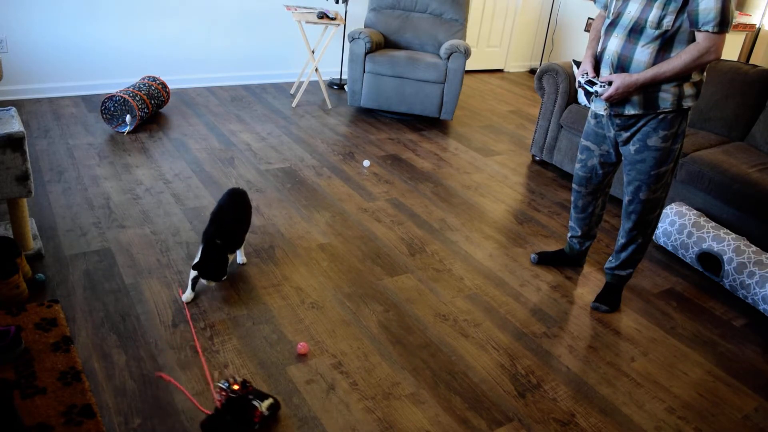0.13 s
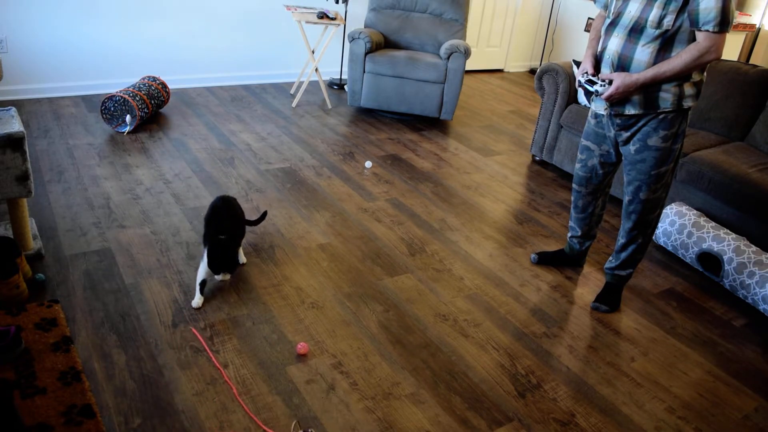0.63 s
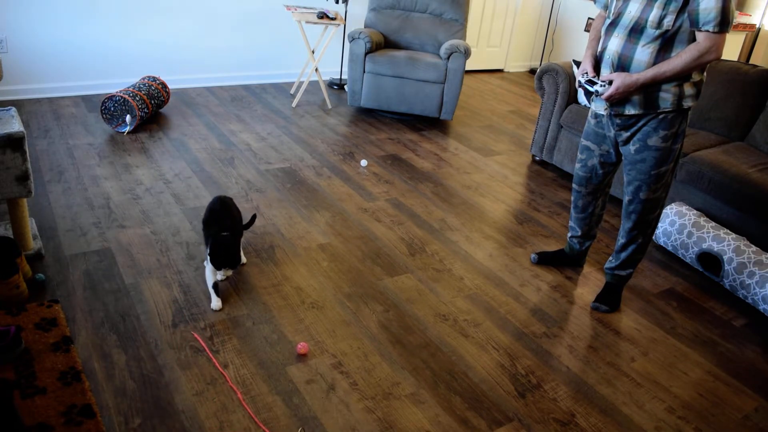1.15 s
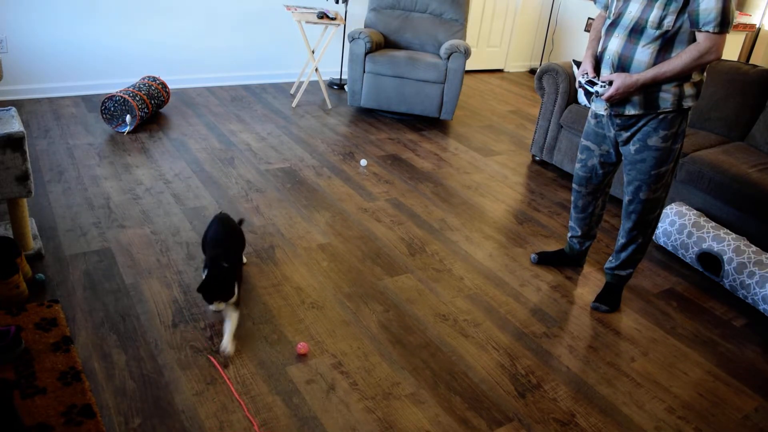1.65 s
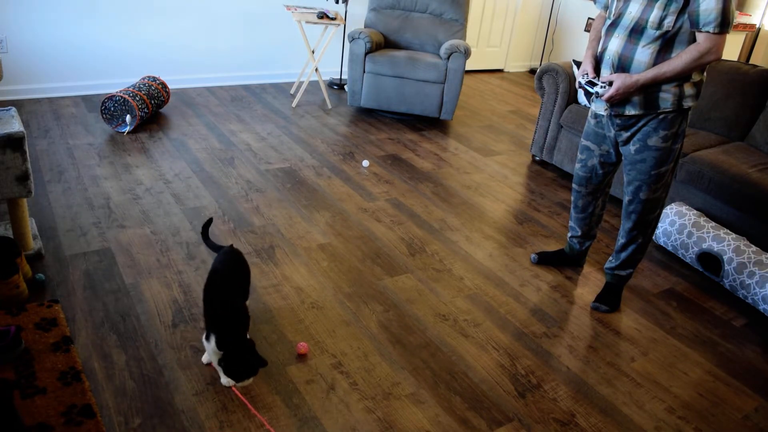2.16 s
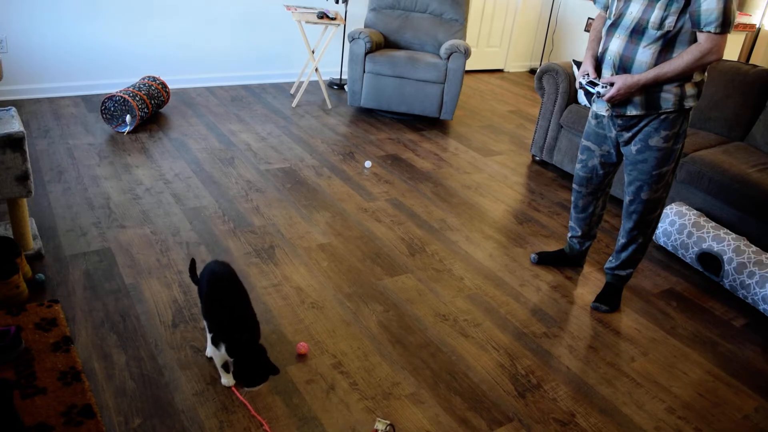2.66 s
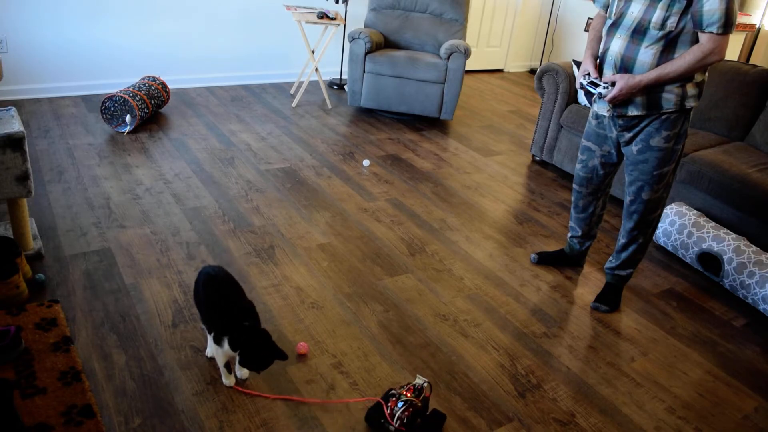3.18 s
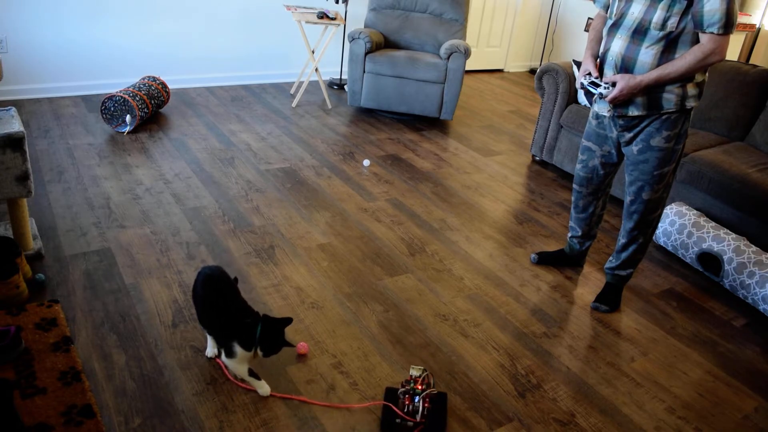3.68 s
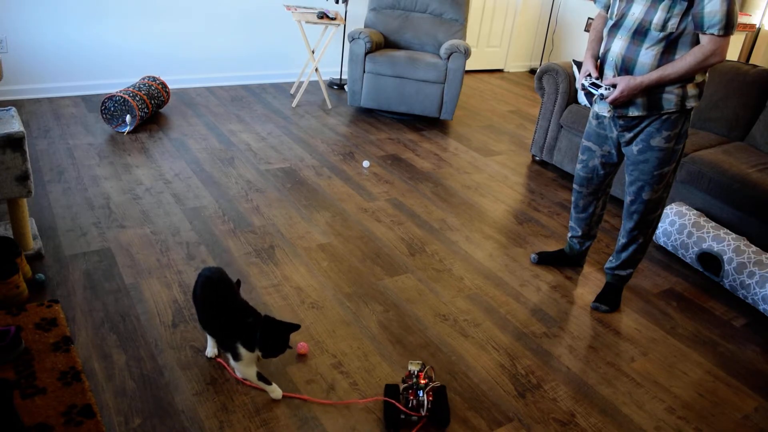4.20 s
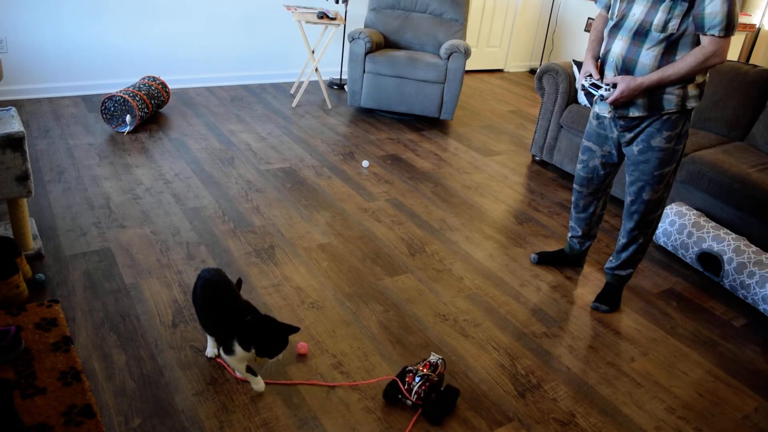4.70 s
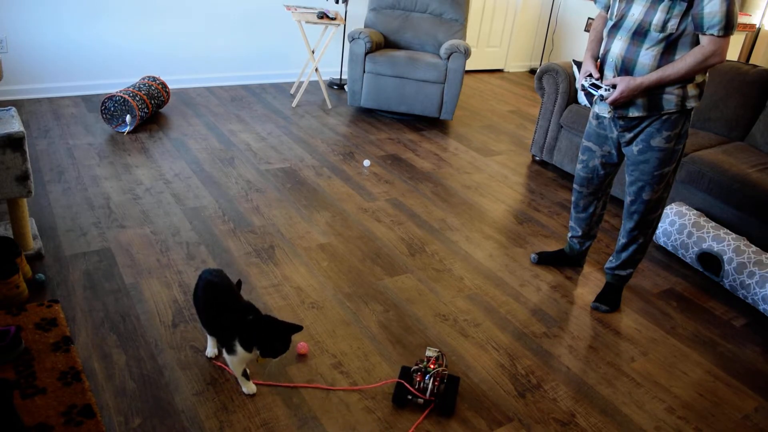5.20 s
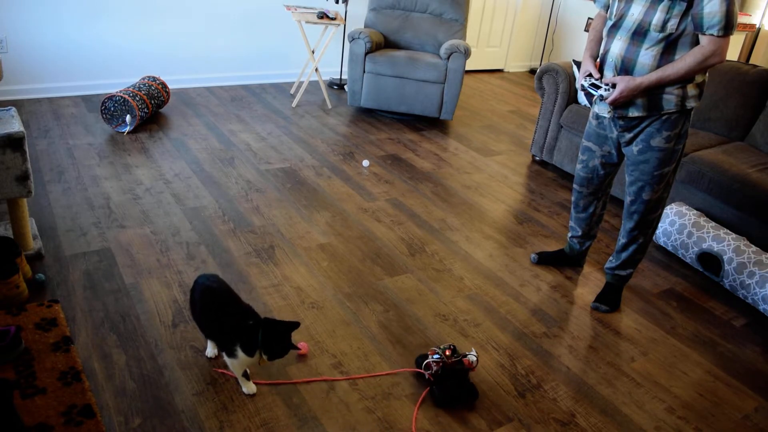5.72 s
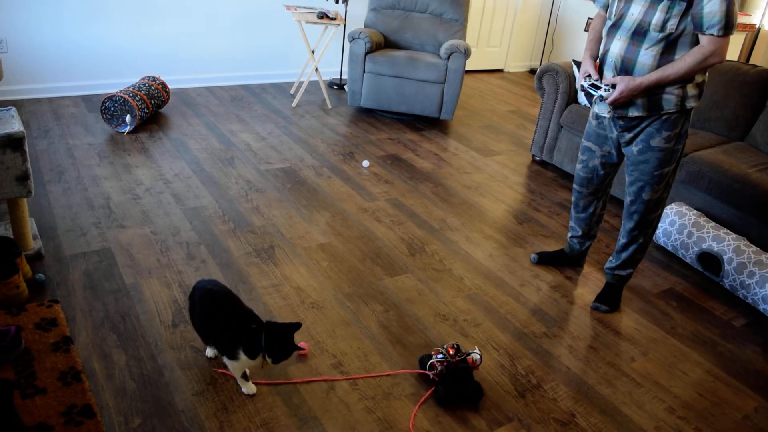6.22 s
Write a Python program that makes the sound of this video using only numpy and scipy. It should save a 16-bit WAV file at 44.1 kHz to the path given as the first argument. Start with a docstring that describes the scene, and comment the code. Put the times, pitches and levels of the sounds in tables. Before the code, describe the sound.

A small remote-controlled car drives over a wooden floor in a quiet living room. Already whirring loudly at the start, it fades, then runs again for a longer stretch with thin dry squeaks, pauses, and continues in short jerky bursts. Plastic gears rattle and tick, wheels drum and knock on the boards. One distant-ish microphone picks up light room reverberation and a faint low hum.

```python
"""A small remote-controlled car whirs in stop-start bursts over a wooden floor in a quiet living room.
Gears: dense noise impacts ring loose plastic parts and shell. Wheels: impacts drum chassis and boards.
Tyres rumble, chassis rings whine, teeth tick, wheels knock, a dry bearing squeals, gear play clunks.
Motor speed curves set the levels of whirr, treble, drumming and tyres; random reflections add the room."""
import sys
import numpy as np
from scipy import signal
from scipy.fft import rfft, irfft
from scipy.io import wavfile
from scipy.ndimage import uniform_filter1d

SR = 44100
rng = np.random.default_rng(int(sys.argv[2]) if len(sys.argv) > 2 else 0)


def undo_db(level):
    """Turn decibels back into plain size, where 20 dB means ten times bigger."""
    steps = np.asarray(level, float) / 20
    return 10 ** steps


def wrap_up_sound(samples):
    """Save the sound to the file named by the first command line argument, as 16-bit audio."""
    columns = np.atleast_2d(samples).T
    # keep every value between -1 and 1, then stretch to whole-number steps
    tamed = np.clip(columns, -1, 1)
    steps = np.round(tamed * 32767).astype(np.int16)
    wavfile.write(sys.argv[1], SR, steps)


N = 280035
TIME_S = np.arange(N) / SR
SLOW_TIME_S = TIME_S[::32]


def evened(x):
    """Scales to rms 1."""
    return x / np.sqrt(np.mean(x ** 2) + 1e-20)


def read(points, hz):
    """Interpolates (frequency, value) points over log frequency."""
    f, value = np.transpose(points)
    return np.interp(np.log(hz + 1), np.log(f + 1), value)


def control(table, column):
    """One column of a table as a curve over time."""
    rows = np.vstack(table)
    return np.interp(TIME_S, rows[:, 0], rows[:, column])


def wander(seconds):
    """Slow chance of rms 1 that changes over about the given time."""
    size = max(round(seconds * SR), 1)
    return evened(uniform_filter1d(uniform_filter1d(rng.standard_normal(N), size), size))


def add(mix, start_s, sound):
    """Adds a sound in place, cut off at the end of the mix."""
    part = mix[round(start_s * SR):][:len(sound)]
    part += sound[:len(part)]


def resonate(x, hz, width_hz):
    """A two-pole ring of about gain 1 at its centre."""
    r = np.exp(-np.pi * width_hz / SR)
    return signal.lfilter([1 - r * r, 0, r * r - 1], [2, -4 * r * np.cos(2 * np.pi * hz / SR), 2 * r * r], x)


def glide(x, hz, width_hz):
    """A ring of rms 1 that follows the curve hz: shift down, smooth twice, shift back."""
    turn = np.exp(2j * np.pi * np.cumsum(hz) / SR)
    r = np.exp(-np.pi * width_hz / SR)
    once = signal.lfilter([1 - r], [1, -r], x / turn)
    twice = signal.lfilter([1 - r], [1, -r], once)
    return evened((turn * twice).real)


def causal(gain_db):
    """Impulse response that starts at once and has the given colour (minimum phase)."""
    log_gain = np.log(undo_db(np.maximum(gain_db, -100)))
    circle = np.concatenate([log_gain, log_gain[-2:0:-1]])
    return np.fft.ifft(np.exp(np.conj(signal.hilbert(circle)))).real[:2048]


def band_rms(x, lo_hz, hi_hz):
    """Rms of x within a band."""
    sos = signal.butter(4, [lo_hz, hi_hz], "bandpass", fs=SR, output="sos")
    return np.std(signal.sosfilt(sos, x))


def impacts(per_s, spread_db, smooth):
    """Random blows of uneven size over smooth rubbing noise, both throbbing once a motor turn."""
    shaft_hz, depth = 139, .12
    size = undo_db(spread_db * np.minimum(rng.exponential(1, N), 3.2)) * rng.choice([-1., 1.], N)
    blows = evened(size * (rng.random(N) < per_s / SR))
    turns_per_s = shaft_hz * (1 + .03 * evened(uniform_filter1d(rng.standard_normal(N), 4000)))
    throb = 1 + depth * np.cos(2 * np.pi * np.cumsum(turns_per_s) / SR)
    return throb * (blows + smooth * rng.standard_normal(N))


def scattered(per_s, level_db, hz, detune):
    """Rows (time [s], level [dB], frequency [Hz]) at random moments, 0-6 dB under level_db there."""
    when, size, pitch = rng.random((round(per_s * N / SR), 3)).T
    at = (when * (N - 1)).astype(int)
    pitch_hz = (hz * np.ones(N))[at] * (1 + detune * (2 * pitch - 1))
    return list(zip(TIME_S[at], level_db[at] - 6 * size, pitch_hz))


def speed(start_s, powered_s, spin_up_s, coast_s):
    """Share of full speed: rises towards 1 under power, then drag brings it to rest."""
    drag = 0.14  # steady friction, share of full speed
    rising = 1 - np.exp(-np.clip(SLOW_TIME_S - start_s, 0, powered_s) / spin_up_s)
    coasting = np.exp(-np.maximum(SLOW_TIME_S - start_s - powered_s, 0) / coast_s)
    return np.maximum((rising + drag) * coasting - drag, 0)


# motors switched on, or eased to a lower setting: (start [s], powered [s], spin-up [s], coast-down [s],
# gear whirr at full speed [dB], start jolt before layer scaling [share of full speed])
MOTOR_BURSTS = [(-.5, .93, .06, 0.26, -35.5, 0), (.4, 0.24, 0.028, 0.2, -45.5, 0),
                (1.109, 0.37, 0.067, 0.5, -39.5, 0.17), (1.49, .76, 0.022, .2, -39, .3),
                (2.507, .45, 0.064, 0.32, -37, 0.17), (3.2, 0.067, 0.036, 0.11, -41, 0.031),
                (3.255, 0.12, 0.039, 0.19, -37.5, .5), (3.596, 0.073, 0.051, 0.22, -38, 0.48),
                (3.851, .11, 0.056, 0.17, -39, 0.48), (4.081, 0.3, 0.051, .25, -41.5, 0.51),
                (4.709, 0.19, 0.068, 0.21, -38.5, 0.21), (5.236, 0.45, 0.052, 0.21, -42, 0.62),
                (6.084, .4, 0.09, .2, -42.5, 0.42)]
# loudness grows as this power of speed
WHIRR_LAW, DRUM_LAW, TREBLE_LAW, TYRE_LAW = 2.05, 1.6, 2.54, 1.22


def effort_db(law, jolted=0):
    """Layer level as a power of motor speed, summed over bursts; a start jolt shakes it and dies away."""
    lurch_s = 0.054
    power = 1e-12
    for start_s, powered_s, spin_up_s, coast_s, db, jolt in MOTOR_BURSTS:
        since_s = SLOW_TIME_S - start_s
        lurch = jolted * np.clip(jolt, 0, 1) * (since_s >= 0) * np.exp(-abs(since_s) / lurch_s)
        turning = speed(start_s, powered_s, spin_up_s, coast_s)
        power = power + undo_db(2 * db) * (turning + lurch) ** (2 * law)
    return np.interp(TIME_S, SLOW_TIME_S, 10 * np.log10(power))


# how the car faces the microphone, rest is front: (time [s], side [share], rear [share])
CAR_FACING = [(0, 0.53, .3), (.5, 0.66, 0.04), (1.15, 0.1, 0.44), (1.4, 0.06, 0.4), (1.9, 0.2, 0.3),
              (2.3, 0.35, 0.35), (2.6, 1, 0.2), (3.1, 0.8, 0), (3.25, 0.2, 0.87), (3.7, 0.34, 0.9),
              (4.05, .05, 0.8), (4.15, 0.9, 0.2), (4.6, 1, 0.2), (4.75, 0.15, 0.8), (5.1, 0.2, 0.7),
              (5.25, 1, 0.1), (5.8, 0.75, 0), (6.15, 0, 0.9), (6.35, 0.1, 0.5)]


def facing():
    """Shares of front, side and rear that the microphone sees, scaled to sum to 1."""
    side, rear = (np.clip(control(CAR_FACING, column), 0, 1) for column in (1, 2))
    shares = np.array([np.maximum(1 - side - rear, 0), side, rear])
    return shares / shares.sum(axis=0)


# broad gear colour: (frequency [Hz], relative density [dB per Hz])
GEAR_COLOUR = [(180, -42.5), (300, -25), (545, -7.5), (838, 3.5), (1040, 0), (1520, -13), (2220, -10),
               (2580, -12.5), (3970, -17), (7830, -17), (9240, -20), (10700, -21), (15700, -33.5)]
# plastic shell rings over the broad colour:
# (frequency [Hz], width [Hz], from front [dB], from side [dB], from rear [dB])
SHELL_RINGS = [(382, 19, 12.5, 5.5, 5), (1750, 120, 1, -23, -2), (1937, 46, 10, 0, -13),
               (2993, 93, 1.5, -33, 14.5), (3310, 360, -19, -16, 9), (3710, 110, 9.5, -10, -5),
               (4300, 180, 7, 0.5, 7), (4650, 59, 11.5, 0, 10), (5570, 170, -16, 4, -15),
               (6000, 50, -34, 3, -18), (6730, 380, -4, 3.5, -4), (7700, 470, 2.5, -2, 4.5),
               (8470, 150, -10, -3, -2), (10050, 180, 2, 2, 6), (10700, 340, 10, 5, 3),
               (12000, 170, -3, 7, -17), (12700, 180, 12, 8, -4)]


def shell_colour(face):
    """Broad gear colour with the shell rings on top, dipped in the drum region."""
    hz = np.fft.rfftfreq(4096, 1 / SR)
    rings = sum(undo_db(2 * row[2 + face]) / (1 + (2 * (hz - row[0]) / row[1]) ** 2) for row in SHELL_RINGS)
    dip_db = -14. * np.exp(-(np.log((hz + 1) / 850) / 0.34) ** 2)
    return causal(read(GEAR_COLOUR, hz) + dip_db + 10 * np.log10(1 + rings))


# layer balance as the car moves about: (time [s], gear treble over whirr [dB],
# housing ring over whirr [dB], upper drum ring over drumming [dB], tyre rumble over whirr [dB])
LAYER_BALANCE = [(0, 1, -14, -15, -14.5), (.25, 1, -10, -2, -14), (.6, 0, -14, -8, -17),
                 (1.2, 4, -9, -12, -17.5), (1.45, -2.5, -8, -17, -17.5), (1.62, -0.5, -9, -10, -15.5),
                 (1.95, -1, -10, -8, -23), (2.2, -7, -20, -30, -16), (2.65, -1.5, -14, -5, -18),
                 (2.95, -0.5, -13, -10, -19.5), (3.3, 3.5, -16, -5.5, -21.5), (3.7, -4.5, -11, -4.5, -10),
                 (3.95, -2.5, -19, -3.5, -12.5), (4.3, 3.5, -11, -16, -16), (4.6, -4, -10, -15, -0.5),
                 (4.85, 0.5, -12, -2.5, -18), (5.3, 2.5, -12, -11.5, -22), (5.5, 2.5, -6, 0, -19),
                 (5.68, -1.5, -13, -7, -9), (6.0, -4, -13, -19, -20), (6.22, -1, -0.5, 0, -20),
                 (6.35, -4, -15, -11, -22)]


def gears(level_db, treble_db):
    """Dense tooth impacts ring the shell and the housing; faster gears sound brighter."""
    rattle = impacts(per_s=3000, spread_db=-1.0, smooth=0.71)
    faces = [signal.oaconvolve(rattle, shell_colour(face))[:N] for face in range(3)]
    whirr = sum(share * x / band_rms(x, 1700, 6000) for share, x in zip(facing(), faces))
    hz = np.fft.rfftfreq(N, 1 / SR)
    treble = irfft(rfft(whirr) / (1 + (6000 / (hz + 1)) ** 4), N)
    housing_hz = 2540 * (1 + .01 * wander(.08))
    housing_db = control(LAYER_BALANCE, 2) + 1.0 * wander(0.081)
    housing = undo_db(housing_db) * glide(rattle, housing_hz, 270.0)
    return undo_db(level_db) * (whirr - treble + housing) + undo_db(treble_db) * treble


# chassis and boards: (frequency [Hz], width [Hz], relative level [dB])
LOW_DRUM_RINGS = [(502, 10, -1), (583, 130, 5.5), (623, 15.5, -4.5), (716, 36, -0.5), (770, 72, 1.5),
                  (830, 32, -1), (885, 71, 4.5), (993, 120, 12)]
# higher chassis and boards: (frequency [Hz], width [Hz], relative gain [dB])
HIGH_DRUM_RINGS = [(1205, 200, 13.5), (1304, 30, 4), (1440, 27, -24.5)]
# boards under the car: (time [s], drumming over whirr [dB], centre [Hz], spread [octaves])
FLOOR_BOARDS = [(0.0, 1, 580, 0.17), (.15, -5, 707, 0.22), (.38, -7.5, 716, 0.16), (.47, -1, 724, 0.14),
                (.75, 1.5, 764, 0.23), (1.3, -1.5, 694, 0.25), (1.45, -6.5, 710, 0.19),
                (1.55, -3.5, 750, .12), (1.74, -0.5, 720, 0.23), (1.82, -6, 810, 0.11),
                (1.9, -1, 830, 0.092), (2.25, -5, 760, 0.15), (2.65, -1.5, 865, 0.13),
                (2.8, -4.5, 820, 0.1), (3.05, -0.5, 810, 0.42), (3.35, -4, 790, 0.36), (3.7, -5, 680, 0.29),
                (3.95, -4.5, 674, 0.2), (4.2, -1, 790, 0.36), (4.37, 0.5, 710, 0.1), (4.47, -2, 695, 0.3),
                (4.51, 8, 700, 0.27), (4.62, 1.5, 690, 0.32), (4.85, -3, 690, 0.21), (5.3, -0.5, 770, 0.17),
                (5.5, -1, 770, 0.094), (5.75, -2.5, 830, 0.29), (6.2, -1.5, 760, 0.11),
                (6.35, 0.5, 720, 0.17)]


def drumming(level_db):
    """Wheels and axles shake chassis and boards; the rings nearest the moving centre are heard best."""
    lumps_db, lumps_s = 1.38, 0.056  # swells from uneven boards
    shake = impacts(per_s=460, spread_db=-1.0, smooth=0.75)
    centre_hz = control(FLOOR_BOARDS, 2)
    spread_oct = np.clip(control(FLOOR_BOARDS, 3), .08, 1)
    weights = [undo_db(db - 3.6 * (np.log2(hz / centre_hz) / spread_oct) ** 2) for hz, _, db in LOW_DRUM_RINGS]
    low = sum(w * evened(resonate(shake, hz, width_hz))
              for w, (hz, width_hz, _) in zip(weights, LOW_DRUM_RINGS))
    low /= np.sqrt(sum(w ** 2 for w in weights))
    upper = evened(sum(undo_db(db) * resonate(shake, hz, width_hz) for hz, width_hz, db in HIGH_DRUM_RINGS))
    low_lumps = undo_db(lumps_db * wander(lumps_s))
    upper_lumps = undo_db(lumps_db * wander(lumps_s))
    return undo_db(level_db) * (low_lumps * low + upper_lumps * undo_db(control(LAYER_BALANCE, 3)) * upper)


# chassis rings that stand out: (start [s], end [s], frequency [Hz], level over drumming [dB])
CHASSIS_WHINES = [(0.0, .127, 497, -5), (0.103, 0.6, 572, -2.5), (0.0, 0.48, 1324, -4.5),
                  (.274, 0.463, 890, -0.5), (.438, .88, 721, -4), (1.18, 1.427, 708, -3),
                  (1.204, 1.55, 1406, -7), (1.494, 1.797, 710, -2.5), (1.503, 1.95, 2600, -10),
                  (1.815, 2.338, 833, -2.5), (2.505, 2.708, 731, -0.5), (3.26, 3.526, 612, -2),
                  (3.61, 3.814, 637, 1), (3.855, 4.047, 3240, -6), (4.214, 4.508, 704, -6),
                  (4.454, 4.603, 1120, -5), (5.247, 5.614, 760, 1), (5.303, 5.792, 833, -3),
                  (5.33, 5.75, 2540, -12), (6.09, 6.18, 3660, -13), (6.163, 6.335, 2900, -8),
                  (6.168, 6.353, 2484, -6)]


def whines(drum_db):
    """Narrow, wavering tones: shaking that passes one sharp ring, following the drumming level."""
    shake = impacts(per_s=670, spread_db=1.5, smooth=1.0)
    waver = 1 + .012 * wander(.05)
    out = np.zeros(N)
    for start_s, end_s, hz, db in CHASSIS_WHINES:
        span = slice(round(start_s * SR), round(end_s * SR))
        tone = glide(shake[span], hz * waver[span], 35 + .02 * hz)
        add(out, start_s, undo_db(db) * tone * signal.windows.tukey(len(tone), .1))
    return undo_db(drum_db) * out


def rumble():
    """Two soft low bands of noise: the tyres on the boards and the swelling rumble of the house."""
    tyre_lumps_db, deep_db, deep_swell_db = 2.5, -65.5, 3.5
    rolling = impacts(per_s=360, spread_db=2.0, smooth=1.0)
    tyres = resonate(resonate(rolling, 227, 76.0), 227, 76.0)
    deep = resonate(resonate(rng.standard_normal(N), 60, 45.), 60, 45.)
    tyres_db = effort_db(TYRE_LAW) + control(LAYER_BALANCE, 4) + tyre_lumps_db * wander(0.064)
    return undo_db(tyres_db) * evened(tyres) + undo_db(deep_db + deep_swell_db * wander(0.13)) * evened(deep)


# air of the room: (frequency [Hz], relative density [dB per Hz])
AIR_COLOUR = [(15, -44), (25, -19), (49, -10.5), (87, -4), (117, -6), (183, -8), (240, -15), (360, -11.5),
              (700, -15.5), (1000, -15), (1500, -17.5), (3000, -24.5), (6000, -31.5), (11000, -38.5),
              (13000, -47), (15700, -53)]
# appliance hum: (frequency [Hz], level [dB])
APPLIANCE_HUM = [(119, -65.5), (142, -63.5)]


def quiet_room():
    """Steady low air noise and a wavering appliance hum, both filtered from noise."""
    air_db = -55
    colour = undo_db(read(AIR_COLOUR, np.fft.rfftfreq(N, 1 / SR)))
    air = evened(irfft(rfft(rng.standard_normal(N)) * colour, N))
    hum = sum(undo_db(db) * evened(resonate(rng.standard_normal(N), hz, 3.7)) for hz, db in APPLIANCE_HUM)
    return undo_db(air_db) * air + hum


# clearest ticks of the gear teeth: (time [s], peak [dB], frequency [Hz])
TOOTH_TICKS = [(0.0751, -24, 10500), (0.1285, -22, 10400), (0.391, -25, 10700), (0.612, -33, 10900),
               (0.7562, -51, 8502), (0.9058, -53, 9800), (1.2365, -26, 10000), (1.487, -30, 10700),
               (1.516, -29, 10700), (1.5674, -24, 10900), (1.5972, -30, 10900), (1.6151, -23, 10500),
               (1.645, -26, 10600), (1.703, -33, 8590), (1.7872, -32, 12000), (1.8924, -31, 12000),
               (1.9708, -26, 11900), (2.1256, -31, 12100), (2.366, -48, 12700), (2.4315, -40, 8800),
               (2.4484, -44, 8810), (2.5087, -46, 8580), (2.58, -36, 9940), (2.605, -30, 10300),
               (2.818, -27, 10900), (3.2285, -36, 10700), (3.256, -29, 8690), (3.2784, -27, 9230),
               (3.3706, -35, 10700), (3.6695, -35, 10400), (4.1121, -41, 9990), (4.1395, -36, 10900),
               (4.1673, -34, 10800), (4.8233, -28, 10400), (5.035, -44, 8500), (5.2853, -41, 9780),
               (6.1739, -49, 9110)]


def ticks(treble_db):
    """Tiny noisy snaps that ring a high shell mode over a broader body, with a share of top treble."""
    small_per_s, small_over_treble_db, small_hz, top_db = 5, 8, 10400, -6
    t = np.arange(600) / SR
    rows = TOOTH_TICKS + scattered(small_per_s, treble_db + small_over_treble_db, small_hz, 0.04)
    out = np.zeros(N)
    for (start_s, db, hz), noise in zip(rows, rng.standard_normal((len(rows), len(t)))):
        snap = noise * (1 - np.exp(-t / 0.00032)) * np.exp(-t / 0.0028)
        ring = evened(resonate(resonate(snap, hz, 1400), hz, 1400))
        body = evened(resonate(resonate(snap, 8900, 5000), 8400, 5000))
        top = evened(resonate(resonate(snap, 13000, 3000), 13000, 3000))
        sound = ring + 1.3 * body + undo_db(top_db) * top
        add(out, start_s, undo_db(db) * sound / abs(sound).max())
    return out


# loudest knocks of wheels on boards: (time [s], level before envelope [dB], frequency [Hz])
WHEEL_KNOCKS = [(0.32, -19, 920), (0.581, -14.5, 716), (1.28, -18, 800), (1.534, -18, 810),
                (1.71, -15.5, 735), (1.751, -21, 770), (1.99, -17.5, 815), (2.205, -16, 815),
                (2.527, -31, 865), (2.648, -15, 915), (2.839, -18, 835), (2.93, -28, 880), (2.96, -17, 920),
                (3.256, -26, 660), (3.302, -20.5, 990), (4.492, -24, 660), (4.824, -20, 610),
                (5.24, -36, 780), (5.295, -20.5, 810), (5.431, -15, 760), (5.511, -15, 746),
                (5.564, -16, 804), (5.605, -15, 790), (6.173, -20.5, 830), (6.201, -20, 770),
                (6.294, -20.5, 730)]


def knocks(drum_db):
    """A few cycles of the boards, quick to rise and quick to die."""
    small_per_s, small_over_drum_db = 3.5, 19  # level before envelope
    t = np.arange(1500) / SR
    envelope = (1 - np.exp(-t / .001)) * np.exp(-t / 0.0022)
    small = scattered(small_per_s, drum_db + small_over_drum_db, control(FLOOR_BOARDS, 2), 0.14)
    out = np.zeros(N)
    for start_s, db, hz in WHEEL_KNOCKS + small:
        add(out, start_s, undo_db(db) * envelope * np.sin(2 * np.pi * hz * t))
    return out


# dry bearing: (start [s], length [s], level before slips and fade [dB], frequency [Hz], slips [per s])
BEARING_SQUEALS = [(1.74, .3, -52, 12100, 360), (1.755, 0.17, -54, 14800, 60), (1.95, .17, -52, 12000, 400),
                   (2.364, .08, -56, 12300, 99)]


def squeal():
    """A narrow whistle that starts at once, stutters with each slip and fades."""
    fade_db, slip_decay_s = 5, .004
    rubbing = impacts(per_s=340, spread_db=-5.0, smooth=.4)
    out = np.zeros(N)
    for start_s, length_s, db, hz, per_s in BEARING_SQUEALS:
        t = np.arange(0, length_s, 1 / SR)
        slips = np.exp(-(t * per_s % 1) / per_s / slip_decay_s)
        whistle = glide(rubbing[round(start_s * SR):][:len(t)], hz * np.ones(len(t)), 400.)
        add(out, start_s, undo_db(db - fade_db * t / length_s) * slips * whistle)
    return out


# gear play closes as the motors take up load: (time [s], peak [dB], frequency [Hz])
GEAR_CLUNKS = [(2.529, -38.5, 2547), (3.255, -32, 1884), (3.6026, -42, 3150), (3.8559, -36, 1810),
               (4.0844, -32, 2100), (4.712, -44, 1670), (5.238, -33.5, 2700), (6.085, -53, 1770)]


def clunks():
    """A burst of rattle in the lower treble with a 7 ms decay constant."""
    t = np.arange(1500) / SR
    out = np.zeros(N)
    for (start_s, db, hz), noise in zip(GEAR_CLUNKS, rng.standard_normal((len(GEAR_CLUNKS), len(t)))):
        burst = noise * np.exp(-t / 0.007)
        wide = resonate(resonate(resonate(burst, 2300, 2700), 2300, 2700), 2300, 2700)
        sound = evened(resonate(burst, hz, 470)) + 0.71 * evened(wide)
        add(out, start_s, undo_db(db) * sound / abs(sound).max())
    return out


# reverberation: (frequency [Hz], t60 [s])
ROOM_DECAY = [(200, 0.99), (1000, 0.43), (4000, 0.39), (12000, 0.35)]


def room(x):
    """Sparse reflections of random sign, each band dying at its own speed."""
    taps = np.zeros(SR)
    at = np.arange(200, SR - 20, 20)
    taps[at + rng.integers(0, 20, len(at))] = rng.choice([-1., 1.], len(at))
    hz, t, z = signal.stft(taps, SR, nperseg=256)
    decay = undo_db(-60 * t / read(ROOM_DECAY, hz)[:, None])
    tail = signal.istft(z * decay, SR, nperseg=256)[1]
    return signal.fftconvolve(x, tail / np.linalg.norm(tail))[:N]


def scene():
    """Car dry and through the room, plus rumble and room noise; one channel."""
    whirr_db = effort_db(WHIRR_LAW, jolted=0.27)
    drum_db = effort_db(DRUM_LAW, jolted=0.92) + control(FLOOR_BOARDS, 1)
    treble_db = effort_db(TREBLE_LAW) + control(LAYER_BALANCE, 1)
    car = gears(whirr_db, treble_db) + drumming(drum_db) + whines(drum_db)
    car = car + ticks(treble_db) + knocks(drum_db) + squeal() + clunks()
    return (car + undo_db(-9.0) * room(car) + rumble() + quiet_room())[None]


def low_pass(x):
    """Removes everything above the highest recorded frequency."""
    return signal.sosfilt(signal.butter(12, 16640, fs=SR, output="sos"), x)


def record(dry):
    """The band ends sharply near the top."""
    edge_hz = 15790
    edge = signal.firwin(511, edge_hz, window=("kaiser", 9), fs=SR)
    mix = signal.oaconvolve(dry, edge[None], "same")
    return low_pass(mix)


dry = scene()
out = record(dry)
wrap_up_sound(out)
```